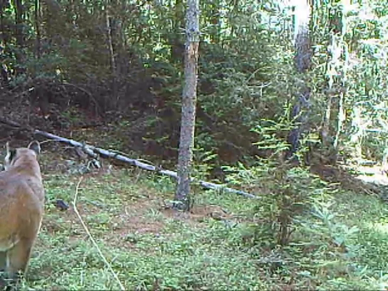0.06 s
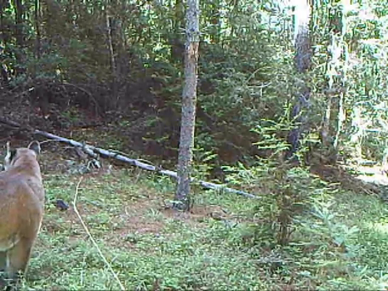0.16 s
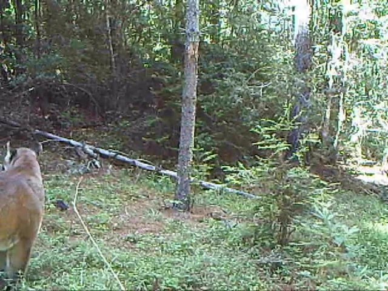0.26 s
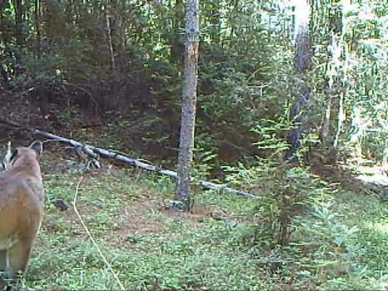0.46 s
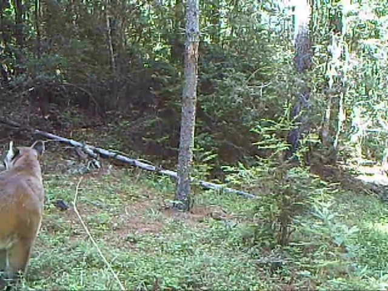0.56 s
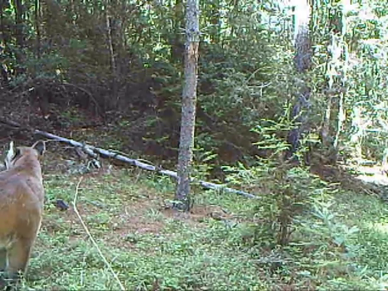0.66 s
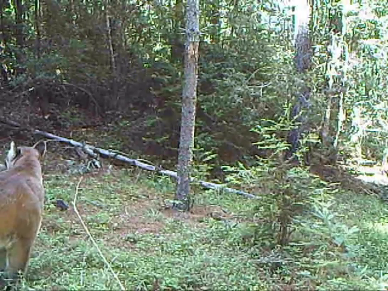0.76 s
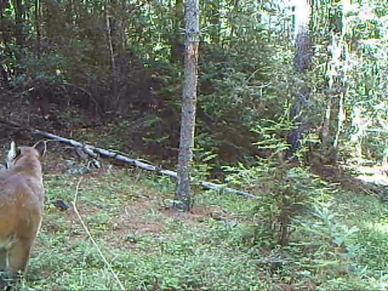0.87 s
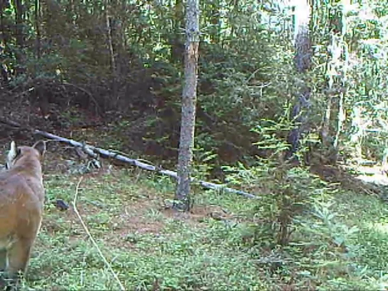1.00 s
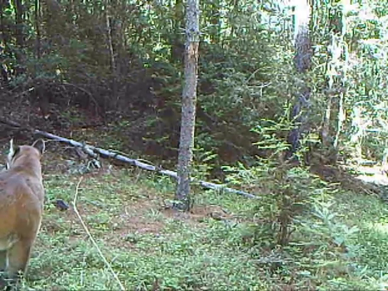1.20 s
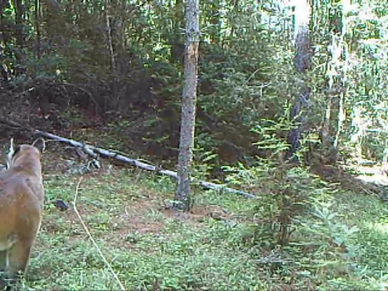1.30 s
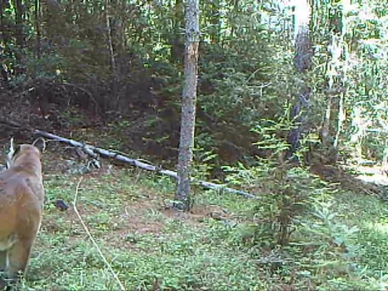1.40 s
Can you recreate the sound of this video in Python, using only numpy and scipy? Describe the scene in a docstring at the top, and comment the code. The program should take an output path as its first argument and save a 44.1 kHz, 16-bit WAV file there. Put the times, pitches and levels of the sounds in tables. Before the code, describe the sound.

A cougar gives one high, whistling call that turns raspy and falls, in a quiet forest.

```python
"""A forest, one microphone among the trunks. First a bird slurs down and swoops up into a chirp.
Right after it a cougar calls once: a high, nearly pure whistle rises, sags and swells, breaks
into a rasp as a slower vibration joins in, then falls away by more than an octave.
Near and far trunks scatter both voices, and the tail fades into a low rumble and a faint hiss."""
import sys
import numpy as np
from scipy import signal
from scipy.fft import rfft, irfft
from scipy.io import wavfile

SR = 44100
rng = np.random.default_rng(int(sys.argv[2]) if len(sys.argv) > 2 else 0)


def int16_out(signal):
    """Quantize to a 16-bit WAV file."""
    q = np.round(np.clip(np.atleast_2d(signal).T, -1, 1) * 32767)
    wavfile.write(sys.argv[1], SR, q.astype(np.int16))


N = 63945
T = np.arange(N) / SR


def from_db(db):
    """Decibels to gain."""
    return 10 ** (np.asarray(db) / 20)


def unit_rms(x):
    """Scale to unit rms."""
    return x / np.sqrt(np.mean(x ** 2) + 1e-20)


def in_time(rows):
    """Each column of a timed curve at every sample."""
    times, *columns = np.transpose(rows)
    return [np.interp(T, times, column) for column in columns]


def phase_of(hz):
    """Running phase of a moving frequency."""
    return 2 * np.pi * np.cumsum(hz) / SR


def coloured(x, spectrum):
    """Shape a sound by a curve of frequency_hz, gain_db."""
    hz, db = np.transpose(spectrum)
    grid = np.maximum(np.fft.rfftfreq(2 * N, 1 / SR), 1)
    gain = from_db(np.interp(np.log(grid), np.log(hz), db))
    return irfft(rfft(x, 2 * N) * gain)[:N]


def drift(rate_hz):
    """Random wander up to a given rate, at unit rms."""
    lowpass = signal.butter(2, rate_hz, fs=SR, output="sos")
    return unit_rms(signal.sosfilt(lowpass, rng.standard_normal(2 * N))[N:])


def resonate(x, hz, width_hz):
    """A steep-sided resonance."""
    r = np.exp(-np.pi * width_hz / SR)
    gain = (1 - r * r) / 2
    section = [gain, 0, -gain, 1, -2 * r * np.cos(2 * np.pi * hz / SR), r * r]
    return signal.sosfilt([section, section], x)


# the clear whistle, one list for its rise and one for its sag: time_s, pitch_hz
WHISTLE_PITCH = [
    [(0.34, 1692), (0.38, 2182), (0.42, 2490), (0.428, 2477), (0.44, 2672), (0.472, 2892), (0.53, 2705),
     (0.56, 2715), (0.59, 2671)],
    [(0.6, 2665), (0.648, 2476), (0.654, 2424), (0.676, 2387), (0.686, 2413), (0.76, 2256), (0.8, 2309),
     (0.852, 2115), (0.892, 2076)],
]
# the rasping fall: time_s, pitch_hz
FALL_PITCH = [(.9, 1980), (.911, 1782), (.925, 1755), (.955, 1857), (.995, 1839), (1.02, 1690),
              (1.046, 1537), (1.075, 1392), (1.097, 1195), (1.118, 1111), (1.132, 882.8), (1.15, 769)]
# strength of the call, ahead of the throat: time_s, level_db
EFFORT = [(.33, -99), (.358, -64), (.375, -87), (.42, -68.5), (.46, -66.5), (.478, -55), (.51, -63.5),
          (.527, -55.5), (.56, -60.5), (.585, -48), (.599, -63), (.607, -45), (.632, -52.5), (.662, -57),
          (.733, -46), (.757, -50.5), (.785, -47.5), (.812, -55), (.83, -46), (.87, -46.5), (.893, -42.5),
          (.902, -45), (.915, -41), (.938, -51), (.98, -55), (1.005, -51.5), (1.058, -54), (1.08, -46.5),
          (1.1, -49), (1.13, -56.5), (1.145, -74), (1.165, -100)]
# gain on each part of the voice: time_s, octave_db, high_overtones_db, flutter_db, rasp_db, air_db
VOICE_MIX = [(.35, 2, 7, -30, -8.5, -23), (.5, -6, 3, -37, -9, -44), (.61, 1.5, 3.5, -58, -28, -37),
             (.66, 5.5, 13, -40, -26.5, -18), (.73, 7, 0, -63, -26, -26), (.80, 7.5, 9, -11, -6.5, -20),
             (.89, -8.5, 1.5, -66, -13.5, -24), (.904, -7, -4, -9.5, -6.5, -20),
             (.916, 7.5, -10, -7.5, -14.5, -5.5), (.97, 6, -1, 1, 3, -2.5), (1.008, -9, -9, -3, -11, -10),
             (1.048, 7.5, -5, 4.5, -6, -6.5), (1.085, -4, -13, -24, -7.5, -20),
             (1.13, 2, -20.5, -10, 1.5, -22)]
# colour of throat and mouth: frequency_hz, gain_db
THROAT = [(300, -8.5), (550, 2), (800, 1), (1250, -0.5), (2000, 0.5), (2900, 0), (3250, -0.5), (3600, -5.5),
          (4400, 3), (5000, -16.5), (6700, -12.5), (7400, 5.5), (8400, -7), (9400, -3), (10700, 1.5),
          (12100, -6.5), (12900, -11), (16000, -27)]

def cougar(jitter_rate_hz=110, rasp_width_hz=322, flutter_ratio=0.272):
    """The cat at the mouth: a whistle, widened by an irregular rasp and joined by a slower vibration."""
    pitch, = in_time(np.vstack([*WHISTLE_PITCH, FALL_PITCH]))
    effort, = from_db(in_time(EFFORT))
    octave_gain, high_gain, flutter_gain, rasp, air_gain = from_db(in_time(VOICE_MIX))
    jitter = 0.0045 + 0.011 * rasp
    phase = phase_of(pitch * (1 + jitter * drift(jitter_rate_hz)))
    slow_phase = phase_of(pitch * flutter_ratio * (1 + 0.0252 * drift(jitter_rate_hz)))
    upper = overtones(phase, octave_gain, high_gain)
    rough_level = 1 + rasp * drift(rasp_width_hz) / 2
    whistle = rough_level * np.sin(phase + rasp * drift(rasp_width_hz) / 2)
    tones = whistle + upper + flutter(phase, slow_phase, flutter_gain)
    return coloured(effort * (np.sqrt(2) * tones + air_gain * mouth_air()), THROAT)


# the whistle's overtones above the octave: pitch_multiple, relative_db
HIGH_OVERTONES = [(3, -35.5), (4, -36.5), (5, -31), (6, -45)]

def overtones(phase, octave_gain, high_gain, octave_db=-14.5, shimmer_db=2, shimmer_hz=14):
    """The whistle's octave, and higher overtones that swell and fade unevenly."""
    high = sum(from_db(db + shimmer_db * drift(shimmer_hz)) * np.sin(round(multiple) * phase)
               for multiple, db in HIGH_OVERTONES)
    return octave_gain * from_db(octave_db) * np.sin(2 * phase) + high_gain * high


# tones beside the whistle: offset_in_flutter_rates, relative_db
SIDE_TONES = [(-1, -4), (1, -12), (2, -17)]

def flutter(phase, slow_phase, gain, break_s=0.922, break_width_s=0.021, break_db=-14.5):
    """The slower vibration adds side tones; a lower one sounds briefly as the voice breaks."""
    sides = sum(from_db(db) * np.sin(phase + round(offset) * slow_phase) for offset, db in SIDE_TONES)
    voice_break = from_db(break_db) * np.exp(-((T - break_s) / break_width_s) ** 2)
    return gain * sides + voice_break * np.sin(phase - 2 * slow_phase)


# resonances of the cat's mouth: centre_hz, width_hz, relative_db
MOUTH_MODES = [(525.5, 119, -27), (877, 110, -12), (1200, 200, 1.5), (1750, 140, -2), (2107, 640, -0.5),
               (2616, 160, -9), (3507, 340, -3), (4240, 210, -16), (7250, 600, -28.5), (10040, 2600, -24.5)]

def mouth_air():
    """Rushing air rings in the mouth."""
    rush = rng.standard_normal(N)
    return unit_rms(sum(from_db(db) * resonate(rush, hz, width) for hz, width, db in MOUTH_MODES))


# the hoarse edge of the call: time_s, centre_hz, level_db
HOARSE_BAND = [(.5, 3600, -83), (.58, 3560, -81.5), (.7, 3480, -73), (.745, 3400, -73), (.77, 3110, -66),
               (.86, 3080, -64.5), (.885, 3020, -74), (.9, 2950, -52), (.92, 2780, -59), (.95, 2780, -90),
               (1, 2680, -90)]

def hoarseness(half_width_hz=85):
    """A narrow band of the cat's breath sinks in pitch above the whistle."""
    centre, db = in_time(HOARSE_BAND)
    phase = phase_of(centre)
    band = drift(half_width_hz) * np.sin(phase) + drift(half_width_hz) * np.cos(phase)
    sounding = (T > HOARSE_BAND[0][0]) & (T < HOARSE_BAND[-1][0])
    return from_db(db) * band * sounding


# a bird among the same trees: time_s, pitch_hz, level_db
BIRD_CALL = [(0, 3950, -74), (.035, 3530, -84.5), (.08, 3120, -88), (.16, 2904, -82.5), (.198, 3126, -76),
             (.222, 3840, -59.5), (.235, 3830, -60), (.27, 3920, -58.5), (.287, 3990, -69),
             (.305, 3950, -81), (.32, 3895, -120)]

def bird(buzz_hz=108.8, swing_hz=168, buzz_depth=0.37):
    """A thin downward slur swoops up into a chirp, buzzing as it gets loud."""
    pitch, db = in_time(BIRD_CALL)
    level = from_db(db)
    buzz_phase = phase_of(buzz_hz * (1 + 0.063 * drift(40)))
    buzz = np.sin(buzz_phase) * np.sqrt(level / level.max())
    return np.sqrt(2) * level * (1 + buzz_depth * buzz) * np.sin(phase_of(pitch + swing_hz * buzz))


# echoes off the ground and the near trunks: delay_s, gain_db
NEAR_ECHOES = [(0.0143, -7), (0.03, -17), (.047, -18), (.071, -25.5)]
# what the far trunks send back: frequency_hz, gain_db
FAR_COLOUR = [(500, 3.5), (1200, -5.5), (1800, -1), (2500, 3.5), (4000, -2.5), (8000, -4), (12000, 4.5)]

def forest(direct, tail_db=-7, t60_s=0.74, build_s=0.0067):
    """Sound reaches the microphone directly, as near echoes and as a diffuse tail from far trunks."""
    near = sum(from_db(db) * np.interp(T - delay, T, direct, left=0) for delay, db in NEAR_ECHOES)
    scatter = rng.standard_normal(N) * from_db(-60 * T / t60_s) * (1 - np.exp(-T / build_s))
    far = signal.fftconvolve(coloured(direct, FAR_COLOUR), scatter / np.linalg.norm(scatter))[:N]
    return direct + near + from_db(tail_db) * far


# low rumble of the air around the microphone: frequency_hz, relative_db
RUMBLE_COLOUR = [(8.8, -18.5), (15, 4), (65, -13.5), (97, -17.5), (278, -27.5), (308, -27), (407, -32.5),
                 (458, -37.5), (500, -45), (650, -45), (1100, -120)]
# faint hiss: frequency_hz, relative_db
HISS_COLOUR = [(200, -8.5), (500, 2.5), (1000, -2.5), (2000, -5.5), (4000, -8.5), (8000, -11), (12000, -13),
               (15000, -12.5), (15700, -12.5)]
# electrical whine: pitch_hz, level_db
WHINE_TONES = [(13629, -93.5), (15625, -88.5)]

def background(rumble_db=-60.5, hiss_db=-73.5):
    """The steady bed under the calls: rumbling air, even hiss and a faint electrical whine."""
    rumble = from_db(rumble_db) * unit_rms(coloured(rng.standard_normal(N), RUMBLE_COLOUR))
    hiss = from_db(hiss_db) * unit_rms(coloured(rng.standard_normal(N), HISS_COLOUR))
    whine = sum(np.sqrt(2) * from_db(db) * np.sin(2 * np.pi * hz * T) for hz, db in WHINE_TONES)
    return rumble + hiss + whine


def scene():
    """Cat and bird from one spot among the trees, in mono, over the background."""
    calls = cougar() + hoarseness() + bird()
    return (forest(calls) + background())[None]


def record(dry, cutoff_hz=15800):
    """A steep low-pass cuts the highest treble from the microphone's signal."""
    return signal.sosfilt(signal.ellip(12, 0.1, 70, cutoff_hz, fs=SR, output="sos"), dry)


dry = scene()
out = record(dry)
int16_out(out)
```